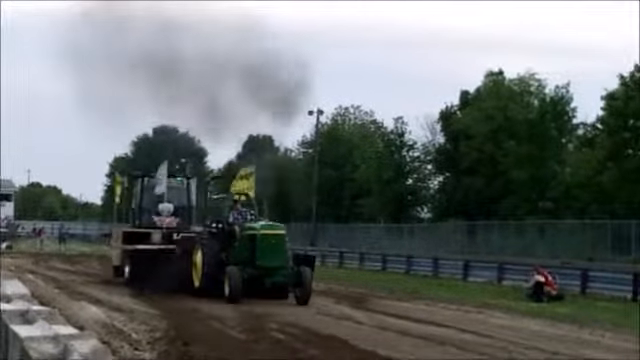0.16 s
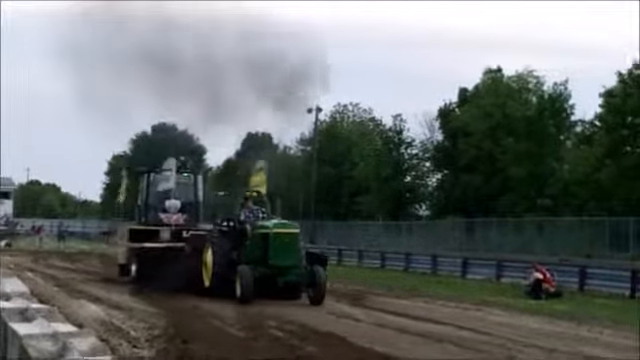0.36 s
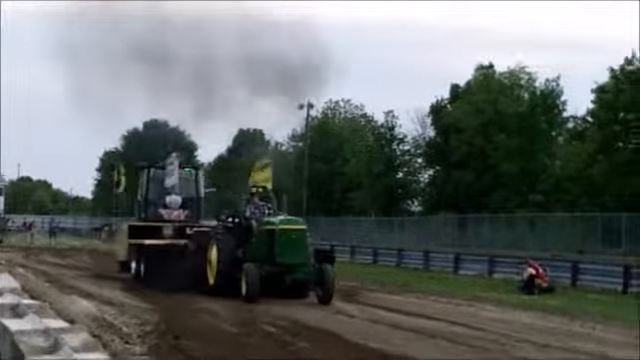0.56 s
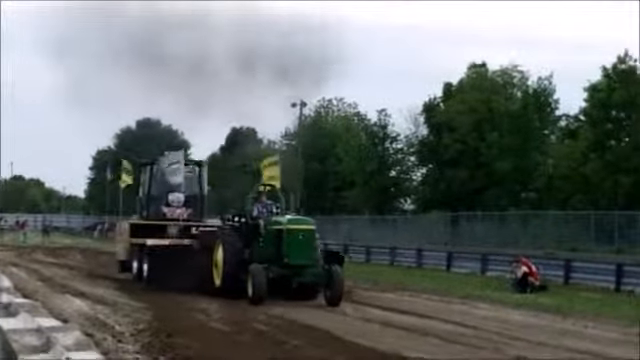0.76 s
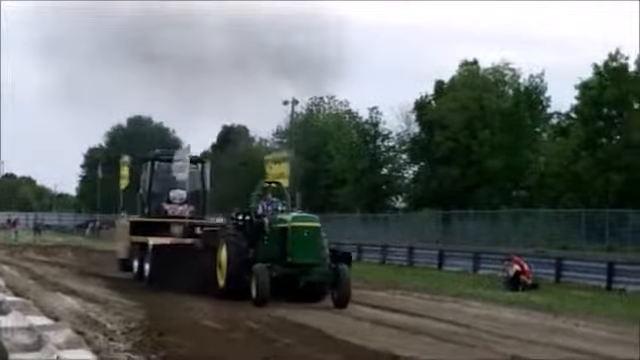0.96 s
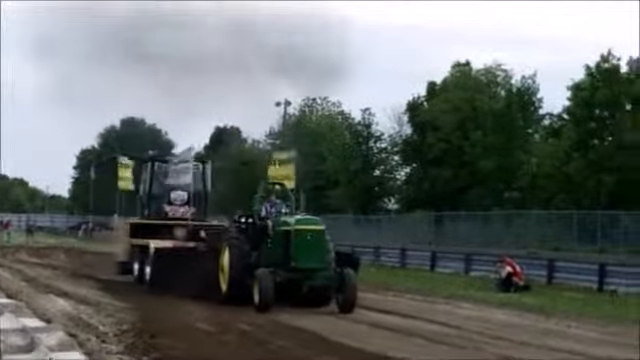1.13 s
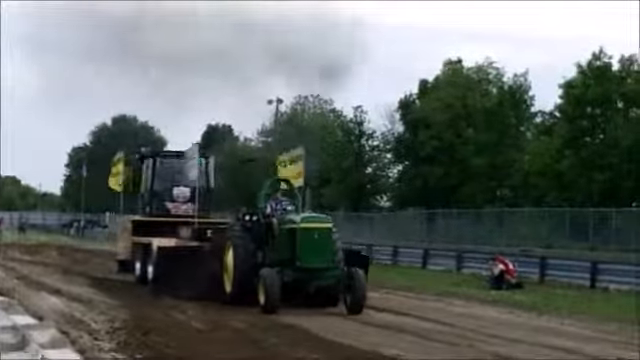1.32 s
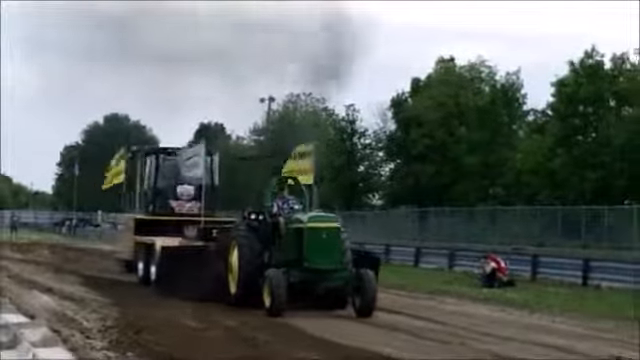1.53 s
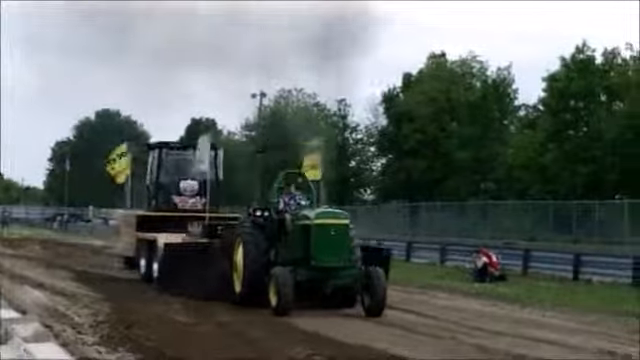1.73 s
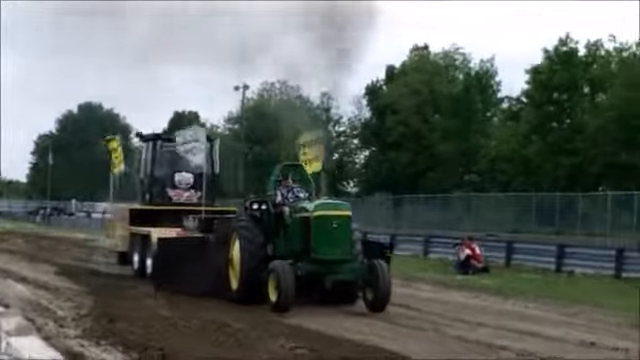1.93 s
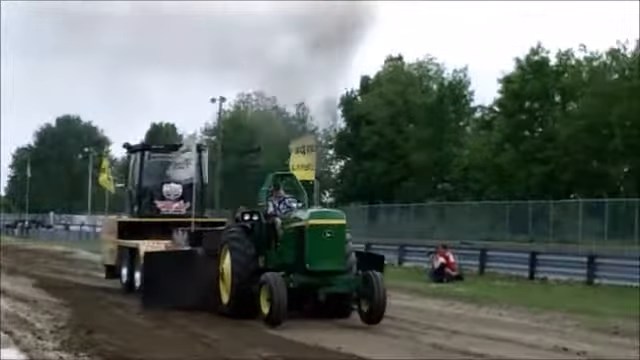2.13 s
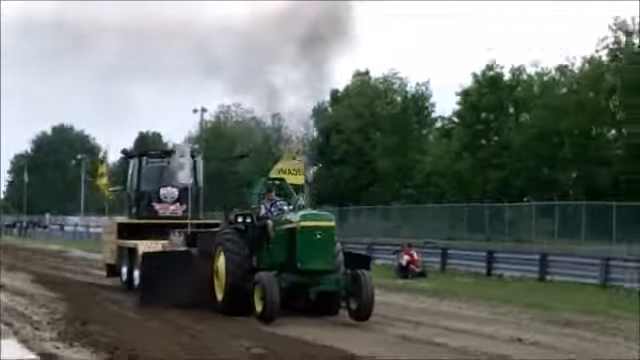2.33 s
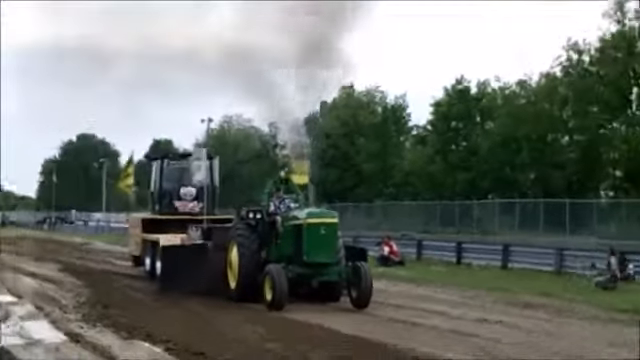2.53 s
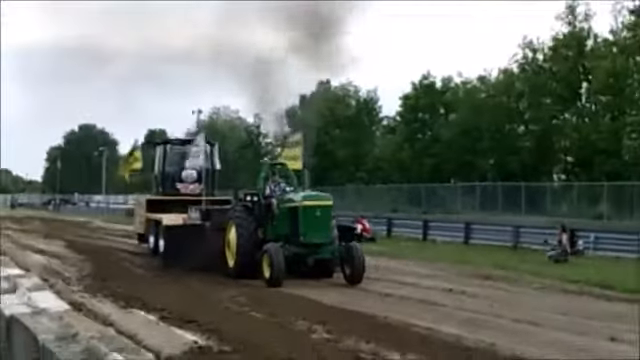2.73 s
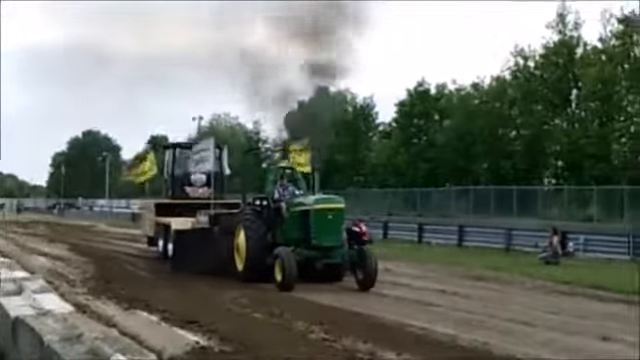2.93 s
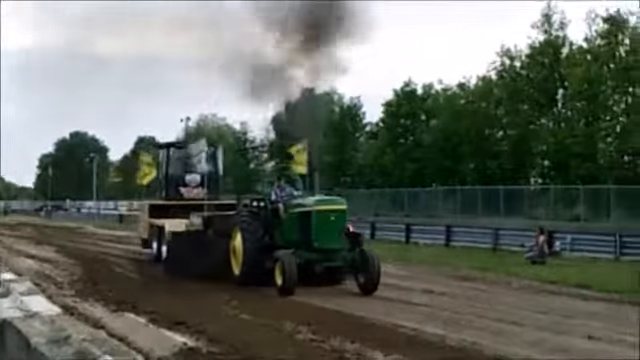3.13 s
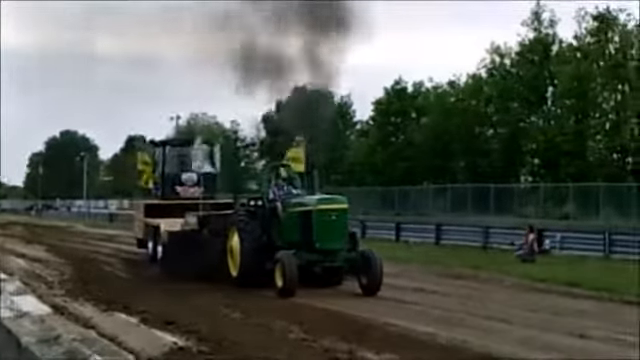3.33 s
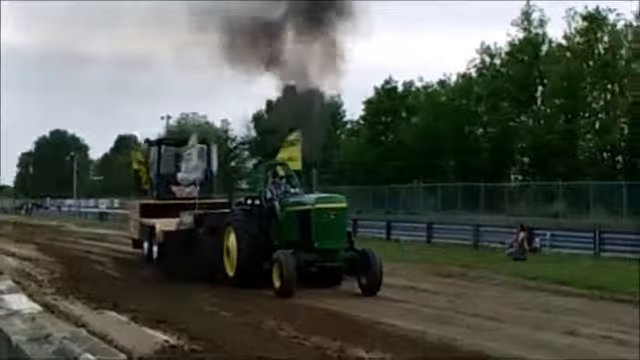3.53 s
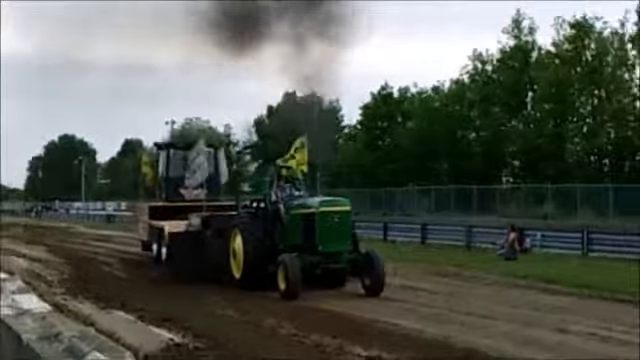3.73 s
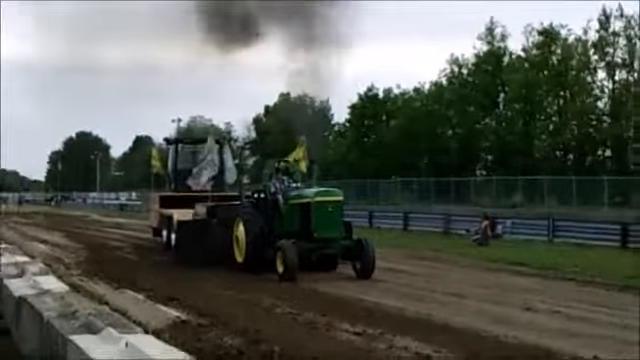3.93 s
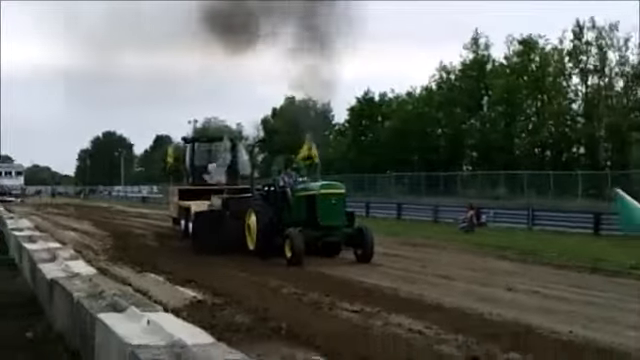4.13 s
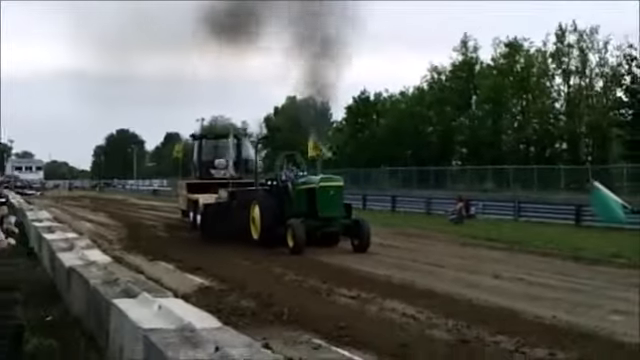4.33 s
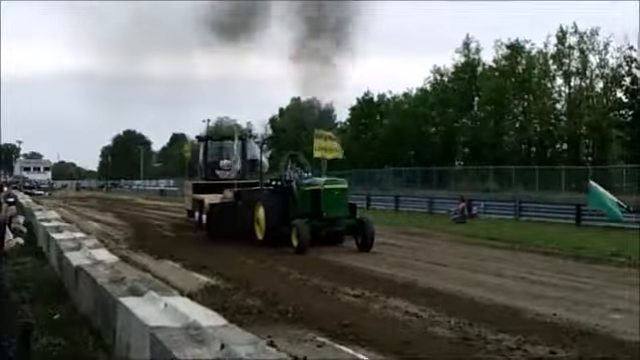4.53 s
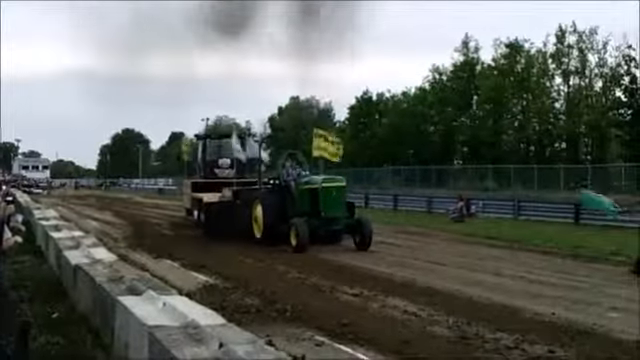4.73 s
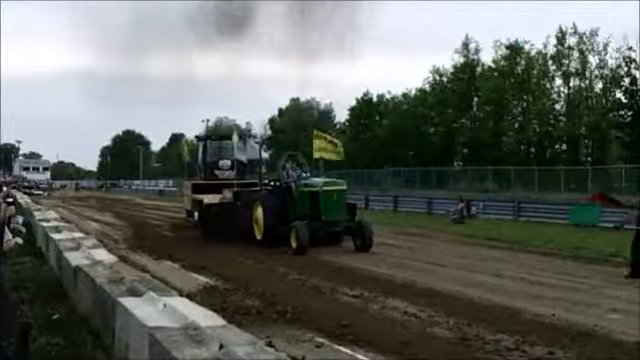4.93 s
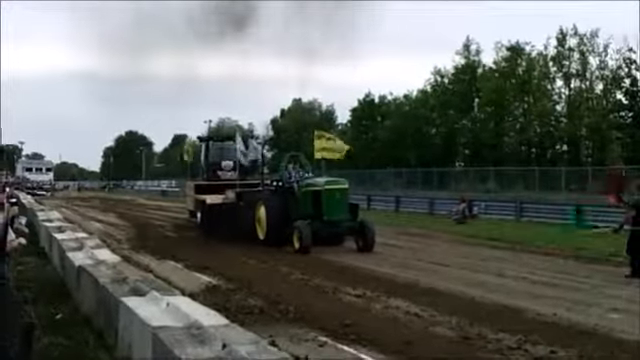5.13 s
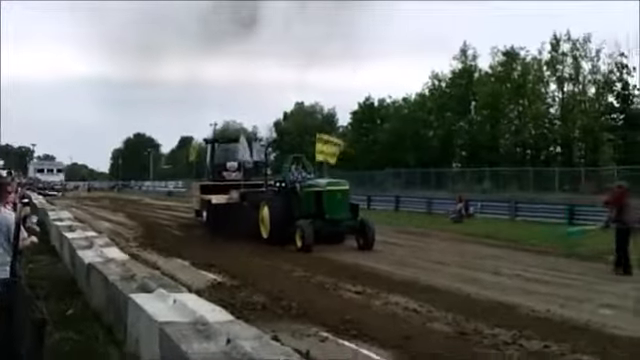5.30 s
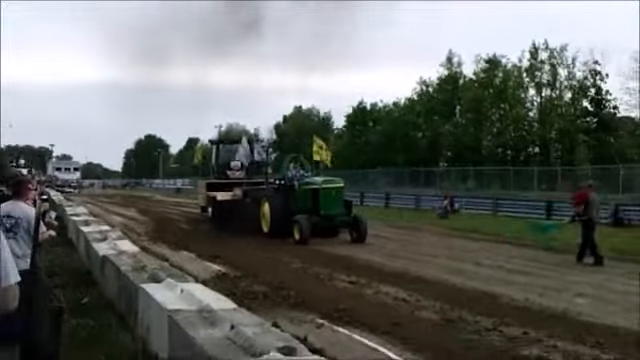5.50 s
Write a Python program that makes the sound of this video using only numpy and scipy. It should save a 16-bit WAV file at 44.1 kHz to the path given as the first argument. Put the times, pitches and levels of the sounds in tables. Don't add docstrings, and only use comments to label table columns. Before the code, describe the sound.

A six-cylinder diesel tractor pulls a heavy sled at full throttle on an open dirt track. A steady low boom carries a harsh, rasping exhaust jet, fizzing treble and a faint, very high turbo whistle, over low sled and wind rumble. Late on, the throttle shuts, the roar collapses and the whistle falls in pitch. Heard by a single distant outdoor microphone with slightly limited treble and small level jumps.

```python
import sys
import numpy as np
from scipy import signal
from scipy.fft import rfft, irfft, next_fast_len
from scipy.io import wavfile
from scipy.ndimage import uniform_filter1d, map_coordinates

SR = 44100
rng = np.random.default_rng(int(sys.argv[2]) if len(sys.argv) > 2 else 0)


def to_linear_factor(level_db):
    exponent = np.asarray(level_db, float) / 20
    return 10 ** exponent


def materialize(psi):
    bounded = np.clip(np.atleast_2d(psi).T, -1, 1)
    quanta = np.round(bounded * 32767).astype(np.int16)
    wavfile.write(sys.argv[1], SR, quanta)


N = 245181
SHUT_S = 4.685


def evened(x):
    return x / np.sqrt(np.mean(x ** 2) + 1e-20)


def curves(rows):
    s, *columns = np.transpose(rows)
    return [np.interp(np.arange(N) / SR, s, column) for column in columns]


def colour(x, points):
    hz, db = np.transpose(points)
    size = next_fast_len(N)
    log_hz = np.log(np.fft.rfftfreq(size, 1 / SR) + 1)
    gain = to_linear_factor(np.interp(log_hz, np.log(hz), db, right=-120))
    return evened(irfft(rfft(x, size) * gain, size)[:N])


def drift(per_s):
    knots = rng.standard_normal(2000)
    return evened(map_coordinates(knots, [np.arange(N) / SR * per_s], order=3))


def bump(t, centre_s, length_s):
    return np.exp(-((t - centre_s) / length_s) ** 2)


def coasting(ease_s):
    return 1 - np.exp(-np.maximum(np.arange(N) / SR - SHUT_S, 0) / ease_s)


# t/s, turn from front to aside/0-1, fuel on the uneven orders/dB
HEADING_FUEL = [(0, 0, -3), (1.9, 0.5, 1.5), (2.9, 0.93, -0.5), (3.1, 1, 2), (4.66, 1, 2),
                (4.75, 0.9, -8.5), (5.56, 0.8, 0)]


def heading():
    return curves(HEADING_FUEL)


# t/s, jet level/dB
EFFORT = [(0.0, -23.5), (.45, -24), (1.2, -23.5), (1.43, -21.5), (1.8, -24.5), (2.42, -21), (2.91, -22),
          (3.18, -17.5), (3.32, -20.5), (3.55, -17), (3.78, -21), (3.95, -18.5), (4.2, -22), (4.5, -18.5),
          (4.665, -19), (4.7, -27), (5.14, -39), (5.45, -34)]


def effort():
    jet_db = curves(EFFORT)[0]
    return jet_db, jet_db + 22


# t/s, rate f/Hz, boom rms level/dB
FIRING = [(0.0, 150, -19), (0.43, 149.8, -22), (1.04, 150, -17), (1.11, 150.3, -21.5), (1.45, 150.2, -19.5),
          (1.9, 150, -19.5), (2.8, 147.9, -19), (2.9, 148, -24), (3.12, 146.2, -22.5), (3.36, 147.5, -18.5),
          (3.55, 146.3, -19.5), (3.7, 147.4, -19), (4.33, 146, -21), (4.52, 144.5, -19), (4.66, 149, -23),
          (4.71, 152.4, -27.5), (5.1, 140, -34), (5.56, 116.5, -39)]


def firing():
    firing_hz, boom_db = curves(FIRING)
    stumble_db = -12 * bump(np.arange(N) / SR, 5.28, length_s=0.028)
    return np.cumsum(firing_hz) / SR, boom_db + stumble_db


# t/s, length/s, depth/dB
ECHO_FADES = [(0.523, 0.085, 13), (1.177, 0.036, 5), (1.535, 0.095, 17), (2.34, 0.11, 12), (2.62, .1, 7),
              (2.916, 0.042, 1), (3.2, 0.14, 4), (3.523, 0.12, 12), (4.33, 0.117, 9.5)]


def overtones(boom_db):
    t = np.arange(N) / SR
    coast = coasting(.3) ** 2
    fade_db = sum(depth_db * bump(t, s, length_s) for s, length_s, depth_db in ECHO_FADES)
    second_db = boom_db - 13 - fade_db - 20 * coast
    fourth_db = boom_db - 28.5 + 5 * heading()[0] + 21 * coast
    return second_db, fourth_db + 3.4 * (1 - coast) * drift(14)


def growl_level():
    return -28.5 + 0.88 * effort()[1] - 3.5 * heading()[0]


# order/multiples of the full engine cycle, front level/dB, aside level/dB
UNEVEN_ORDERS = [(3.015, -1, -7), (4.04, -5, -7), (5.22, -3, -5), (6.84, -8, -16), (7.95, -8, -6),
                 (9.11, -10.5, -7.5), (13.94, -0.5, -2.5), (15.95, 0.5, -0.5), (16.84, -12, -4.5),
                 (18.12, -22, 0), (19.05, -18, -1), (19.92, 5, -2.5), (20.86, -3, -2.5), (22.5, -26, -2),
                 (23.5, -9, -0.5), (24.88, -10, 0), (26.05, -4.5, -2), (26.93, -7, -7.5), (29.1, -9, -9),
                 (29.25, -3, -15)]


def stack(strokes, boom_db):
    second_db, fourth_db = overtones(boom_db)
    boom = to_linear_factor(boom_db + 3 + .5 * drift(45) + .6 * drift(20)) * np.sin(2 * np.pi * strokes)
    second_phase = 4 * np.pi * strokes + 1 + .15 * drift(30)
    boom += to_linear_factor(second_db + 3 + 1.2 * drift(25)) * np.sin(second_phase)
    fourth_phase = 8 * np.pi * strokes + 0.64 * drift(9.8)
    boom += to_linear_factor(fourth_db - 0.5 + 0.92 * drift(15)) * np.sin(fourth_phase)
    aside, fuel_db = heading()
    lines = 0
    for order, front_db, aside_db in UNEVEN_ORDERS:
        wobble = (.022 + .2 * aside) * drift(11) + rng.random()
        db = front_db + aside * (aside_db - front_db) + (1.3 + 2.4 * aside) * drift(9)
        lines = lines + to_linear_factor(db) * np.sin(2 * np.pi * (order * strokes / 6 + wobble))
    return boom + to_linear_factor(growl_level() + fuel_db - 8.5) * lines


CYLINDER_JETS = [0, 2, -.3, .4, -2, .3]


def stroke_level(count, spread_db, chance):
    by_cylinder_db = np.take(CYLINDER_JETS, count % len(CYLINDER_JETS))
    return by_cylinder_db + spread_db * np.clip(chance, -2, 2)


def puffs(strokes, sharp, depth, spread_db):
    count = strokes.astype(int)
    size_db = stroke_level(count, spread_db, rng.standard_normal(2000)[count])
    shape = np.exp(sharp * (np.cos(2 * np.pi * (strokes - .5)) - 1))
    return 1 - depth + depth * 2 * shape * to_linear_factor(size_db)


def pings(strokes, ring_hz, spread_hz, ring_ms):
    count = strokes.astype(int)
    pitch, size, slip, phase = rng.standard_normal((2000, 4))[count].T
    ms = (strokes % 1 - .5 + .04 * slip) * 1000 / SR / np.gradient(strokes)
    turns = (ring_hz + spread_hz * pitch) * ms / 1000 + phase
    ring = np.exp(-(ms / ring_ms) ** 2) * np.cos(2 * np.pi * turns)
    return evened(to_linear_factor(stroke_level(count, 2.0, size)) * ring)


# f/Hz, width/Hz, level/dB
PIPE_MODES = [(872, 50, 5), (1350, 50, 3), (1440, 55, -2.5), (2270, 53, 3.5), (2920, 67, 0.5),
              (4560, 200, 2.5), (4960, 84, 5)]


def piped(points):
    edge_hz, edge_db = np.transpose(points)
    hz = np.geomspace(edge_hz[0], edge_hz[-1], num=400)
    db = np.interp(np.log(hz), np.log(edge_hz), edge_db)
    modes_db = sum(top_db * np.exp(-((hz - f) / width) ** 2) for f, width, top_db in PIPE_MODES)
    return np.transpose([hz, db + modes_db])


def fizz_level():
    warming_db = 5 * np.tanh(np.arange(N) / SR / 2.14)
    return -46 + 1.01 * effort()[1] + warming_db - 5.5 * coasting(0.48) ** 2


# f/Hz, level per Hz/dB
JET_SPECTRUM = [(2500, -12.5), (3600, -12), (4300, 1), (4900, -0.5), (5500, -3), (6300, -13), (7500, -19.5),
                (11000, -52)]
ROAR_SPECTRUM = [(500, -18), (800, -7.5), (1200, -7.5), (2000, -3), (2700, -3.5), (3500, -0.5), (4200, -2),
                 (5500, -4), (7000, -26.5), (10000, -58)]
GROWL_SPECTRUM = [(160, -52), (200, -2), (300, -1), (450, 4), (600, 4.5), (900, 2), (1300, -5.5),
                  (3000, -70)]
FIZZ_SPECTRUM = [(3800, -24.5), (6500, 1), (8460, -10.5), (10200, -14.5), (11200, -22), (12300, -38),
                 (14000, -62)]
# f/Hz, level per Hz/dB
AIR_SPECTRUM = [(9000, -32), (11500, 0), (13500, -3), (15600, -2), (17000, -30)]


def gas(strokes):
    jet_db, fizz_db = effort()[0], fizz_level()
    aside, fuel_db = heading()
    a, b, c, d, e = rng.standard_normal((N, 5)).T
    late = strokes - .075
    jet = colour(a * puffs(late, sharp=1.5, depth=.55, spread_db=1.3), piped(JET_SPECTRUM))
    roar = colour(d * puffs(late - .04, sharp=1.2, depth=.24, spread_db=1.2), piped(ROAR_SPECTRUM))
    growl = colour(b * puffs(strokes + .27, sharp=1.2, depth=.3, spread_db=1.8), GROWL_SPECTRUM)
    fizz = colour(c * puffs(late, sharp=1.0, depth=0.19, spread_db=5.5), FIZZ_SPECTRUM)
    ring = to_linear_factor(fuel_db) * pings(late, ring_hz=4710, spread_hz=510, ring_ms=1.0)
    stream = to_linear_factor(-4) * jet + to_linear_factor(-3.0) * roar + to_linear_factor(-13) * ring
    stream = to_linear_factor(jet_db + 1.0 + 0.77 * drift(14)) * stream
    air_db = fizz_db - 20.5 + 4.4 * aside - 3 * coasting(.05)
    air = to_linear_factor(air_db) * colour(e, AIR_SPECTRUM)
    fizz = to_linear_factor(fizz_db + 6.0 + 0.36 * drift(12)) * fizz
    return stream + to_linear_factor(growl_level() - 2.5) * growl + fizz + air


# t/s, lag/ms, strength/0-1
GROUND = [(0, .72, .4), (1.05, .81, .5), (2.25, .99, .52), (3.6, 1.215, .44), (4.65, 1.26, .42),
          (4.9, 1.21, .15), (5.56, 1.2, .1)]


def mirrored(x):
    lag_ms, share = curves(GROUND)
    at = np.arange(N) - (lag_ms + 0.021 * drift(30)) * SR / 1000
    dulled = signal.sosfiltfilt(signal.butter(2, 7500, fs=SR, output="sos"), x)
    return (x + share * map_coordinates(dulled, [at], order=3)) / np.sqrt(1 + share ** 2)


def whistle(hz, db, shiver, flutter_db):
    turns = np.cumsum(hz * (1 + shiver * hz / 1e4 * drift(300))) / SR
    return to_linear_factor(db + 6 + flutter_db * drift(40)) * np.sin(2 * np.pi * turns)


# t/s, f/Hz
TURBO_PITCH = [(0, 10740), (.5, 10530), (.72, 10680), (.86, 10400), (1.3, 10270), (1.7, 10630),
               (1.92, 10700), (2.25, 11300), (2.63, 11340), (2.8, 11540), (3.03, 11260), (3.26, 11970),
               (3.42, 11560), (3.68, 12110), (3.86, 11600), (4, 11680), (4.39, 11280), (4.66, 11780)]


def turbo():
    drag_per_s = 1.57
    coast_s = np.maximum(np.arange(N) / SR - SHUT_S, 0)
    hz = curves(TURBO_PITCH)[0] / (1 + drag_per_s * coast_s)
    db = -58.5 + 12 * np.log2(1e4 / hz) + .8 * coasting(.05)
    db = db + 1.2 * coasting(.3) * drift(15)
    return whistle(hz, db, shiver=.008 + .011 * coasting(.1), flutter_db=2.2)


# f/Hz, level per Hz/dB
RUMBLE_SPECTRUM = [(15, -20), (30, 4), (50, 7), (75, 2), (110, 9.5), (150, -7), (200, 3), (320, -31)]


def rumble():
    db = -40.5 + .2 * effort()[1] - 4.5 + 0.5 * drift(12)
    return to_linear_factor(db) * colour(rng.standard_normal(N), RUMBLE_SPECTRUM)


# t/s, centre f/Hz, level/dB, length/s
KNOCKS = [(.01, 220, -29.5, 0.017), (1.41, 380, -35, 0.03), (3.076, 303, -31, 0.029),
          (3.19, 200, -34, 0.053), (3.48, 105, -35, .04), (3.495, 210.4, -27.5, 0.055),
          (4.517, 105, -37, .04), (4.684, 200, -33, 0.028), (1.935, 3570, -25, 0.011),
          (4.8, 302, -44.5, 0.11), (5.34, 242, -43, .07), (5.45, 201, -38.5, 0.037)]


def thuds():
    out, t = np.zeros(N), np.arange(N) / SR
    noise = rng.standard_normal(N)
    for s, hz, db, length_s in KNOCKS:
        near = slice(max(round((s - .2) * SR), 0), round((s + .2) * SR))
        body = signal.butter(2, [hz / 1.73, hz * 1.23], "band", fs=SR, output="sos")
        thud = evened(signal.sosfiltfilt(body, noise[near]))
        out[near] += to_linear_factor(db) * thud * bump(t[near], s, length_s)
    return out


# t/s, peak level/dB
JET_CRACKS = [(1.4486, -58), (1.4633, -46), (1.5822, -46), (1.9305, -45), (2.2092, -53), (2.614, -49),
              (3.0799, -48), (3.1452, -41), (3.2021, -51), (3.4391, -48), (3.4521, -37), (3.5159, -36),
              (3.5982, -36), (3.618, -32), (3.6789, -32), (3.881, -48), (3.9416, -38), (4.0312, -52),
              (4.2098, -40), (4.4177, -31), (4.493, -37), (4.5215, -50), (4.6385, -36), (5.168, -57)]


def cracks():
    out, t = np.zeros(N + 400), np.arange(300) / SR
    for s, db in JET_CRACKS:
        snap = rng.standard_normal(300) * np.exp(-t / .0008)
        out[round(s * SR):][:300] += to_linear_factor(db + 9) * snap
    return signal.sosfilt(signal.butter(2, 8000, "high", fs=SR, output="sos"), out[:N])


# t/s, f/Hz, level/dB
SECOND_WHEEL = [(5.27, 10050, -80), (5.3, 9850, -66), (5.38, 9300, -65), (5.47, 8900, -67),
                (5.56, 8400, -72)]


def second_wheel():
    sounding = np.arange(N) > 5.27 * SR
    return whistle(*curves(SECOND_WHEEL), shiver=.016, flutter_db=3.0) * sounding


def scene():
    strokes, boom_db = firing()
    engine = stack(strokes, boom_db) + mirrored(gas(strokes))
    return (engine + turbo() + rumble() + thuds() + cracks() + second_wheel())[None]


def roll_off(x):
    return signal.sosfilt(signal.butter(12, 15760, fs=SR, output="sos"), x)


# t/s, step level/dB
LEVEL_JUMPS = [
    (1.947, -2),
    (5.167, 5.5),
]
# t/s, threshold level/dB, depth/dB
DROPOUTS = [(.199, -50, 14), (0.339, -46, 18), (1.151, -54.5, 15), (1.394, -45.5, 14), (1.437, -43, 7),
            (2.193, -59, 9.5), (3.067, -58, 18), (3.187, -51, 17), (3.42, -57, 7), (3.475, -55, 17),
            (3.506, -52, 13), (3.869, -45, 6.5), (3.935, -55, 10), (4.018, -52, 13), (4.403, -55, 12),
            (4.509, -48, 12), (4.625, -53, 13), (4.692, -59, 4), (4.86, -56, 14), (4.945, -58, 12),
            (5.366, -54.5, 18), (5.381, -54.5, 18)]


def record(dry):
    gained = dry[0] * to_linear_factor(sum(db * (np.arange(N) > s * SR) for s, db in LEVEL_JUMPS))
    over = np.maximum(abs(gained) - .45, 0)
    limited = gained - np.sign(gained) * (over - .25 * np.tanh(over / .25))
    _, t, z = signal.stft(limited, SR, nperseg=1024, noverlap=896)
    power = uniform_filter1d(abs(z) ** 2, size=3, axis=0)
    line_db = 10 * np.log10(uniform_filter1d(power, size=7, axis=1) + 1e-20)
    for s, limit_db, depth_db in DROPOUTS:
        during = np.exp(-((t - s) / .0095) ** 4)
        z = z * to_linear_factor(-depth_db * during * np.clip((limit_db - line_db) / 3, 0, 1))
    mix = signal.istft(z, SR, nperseg=1024, noverlap=896)[1][None, :N]
    return roll_off(mix)


dry = scene()
out = record(dry)
materialize(out)
```